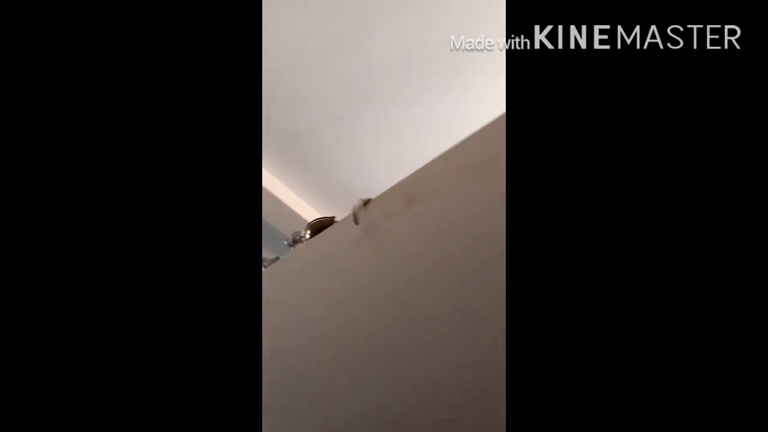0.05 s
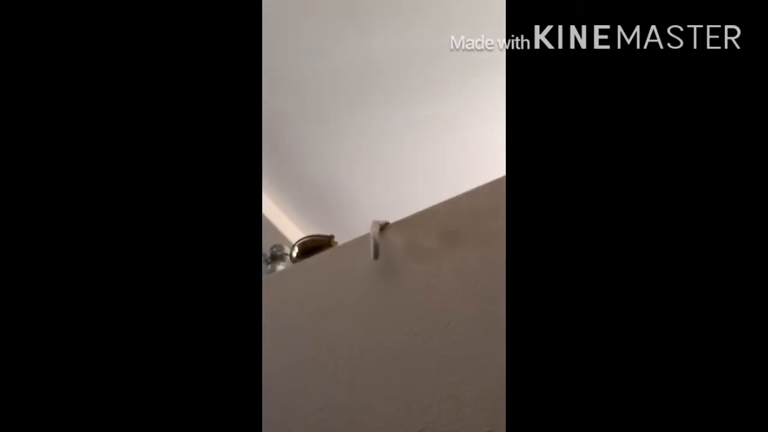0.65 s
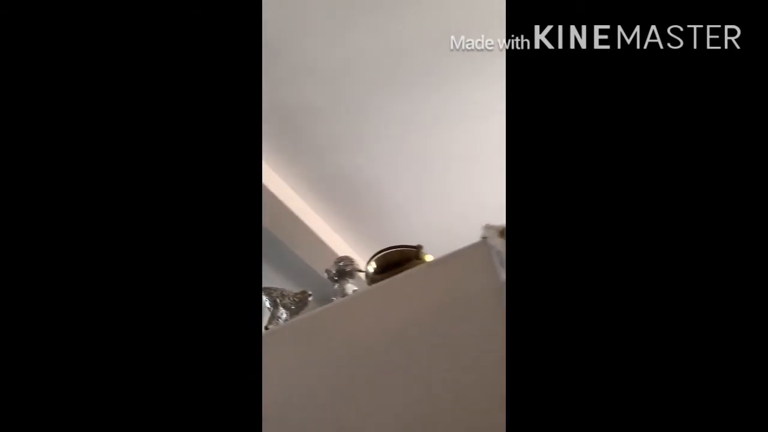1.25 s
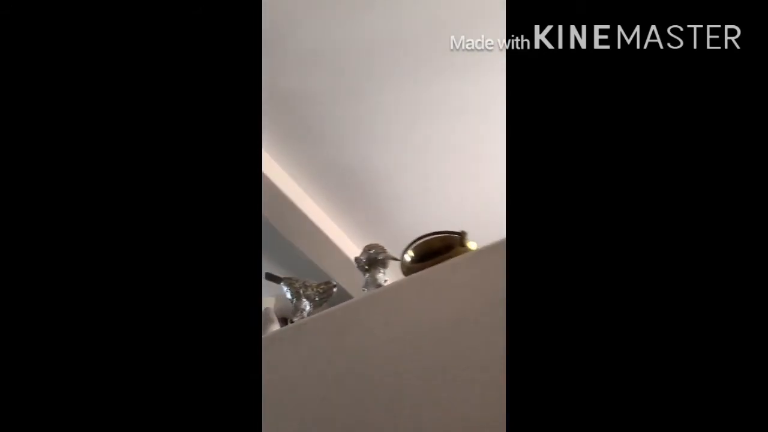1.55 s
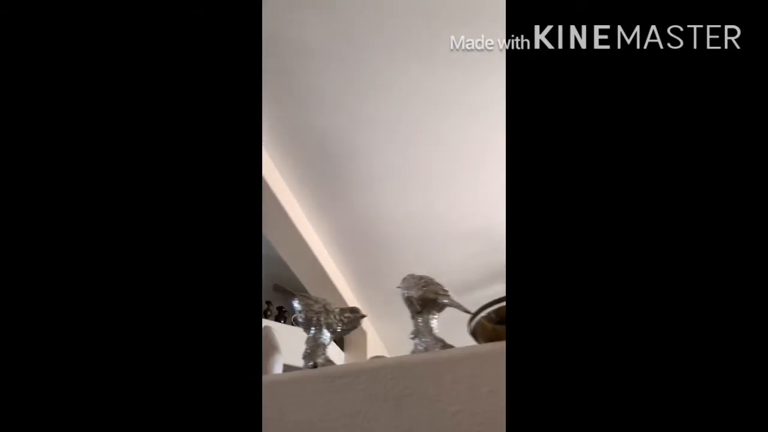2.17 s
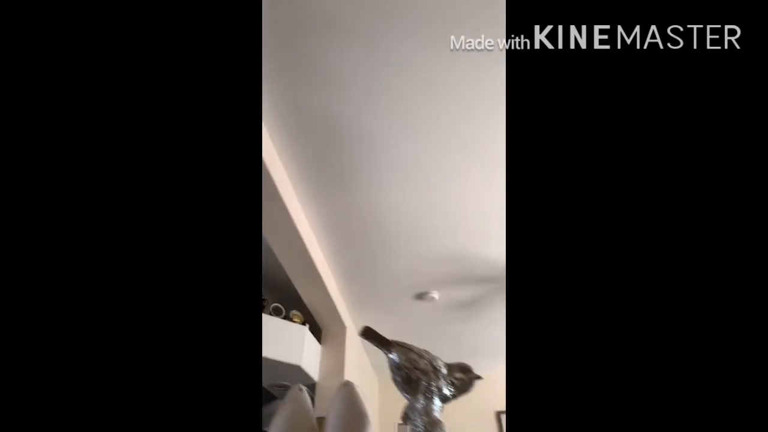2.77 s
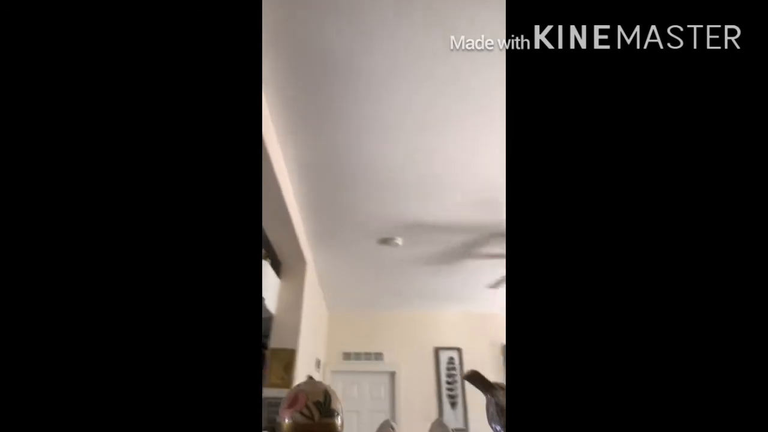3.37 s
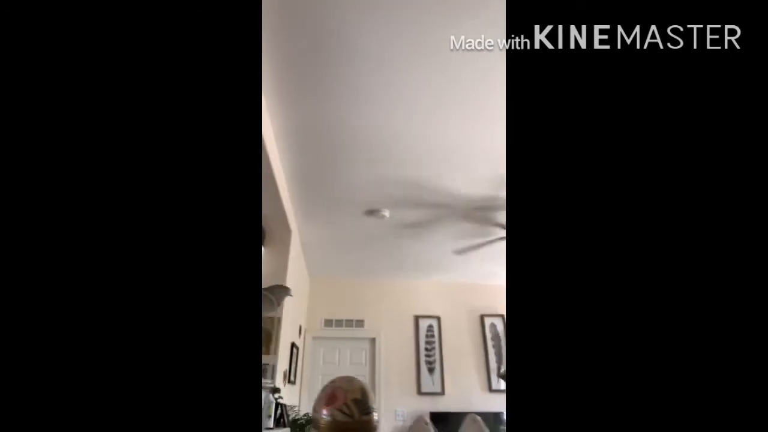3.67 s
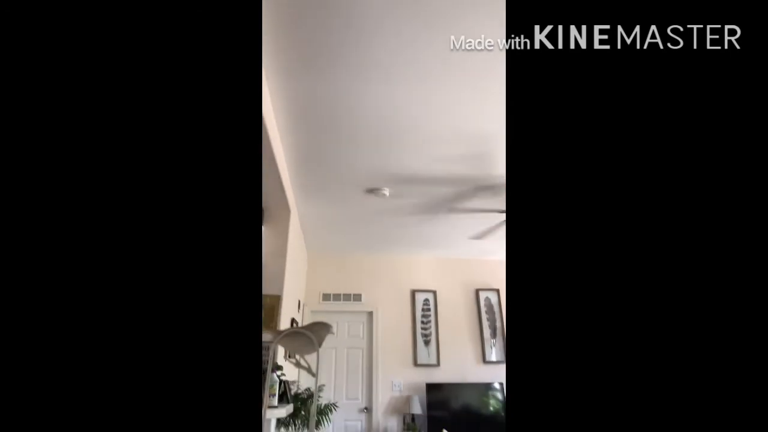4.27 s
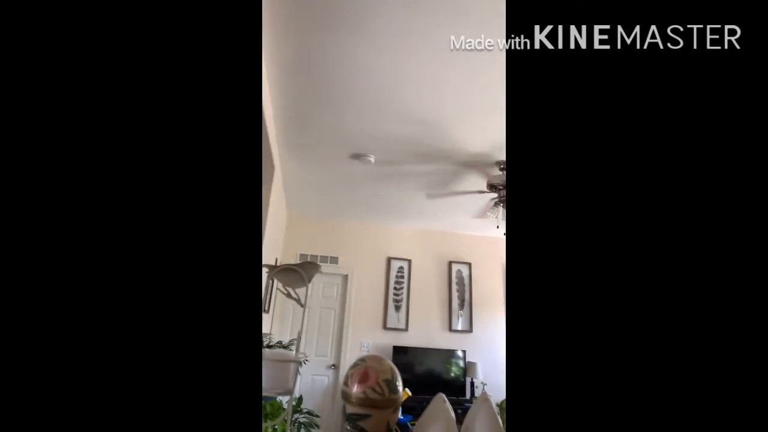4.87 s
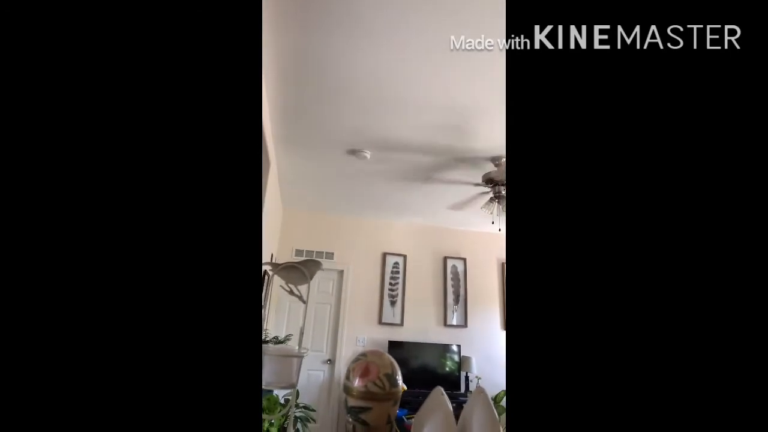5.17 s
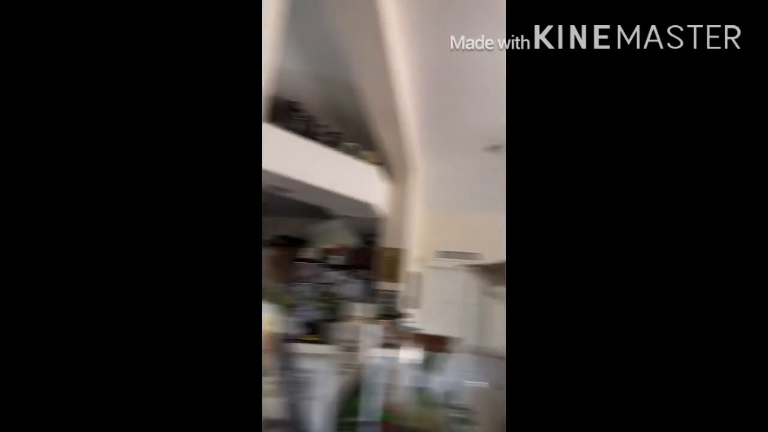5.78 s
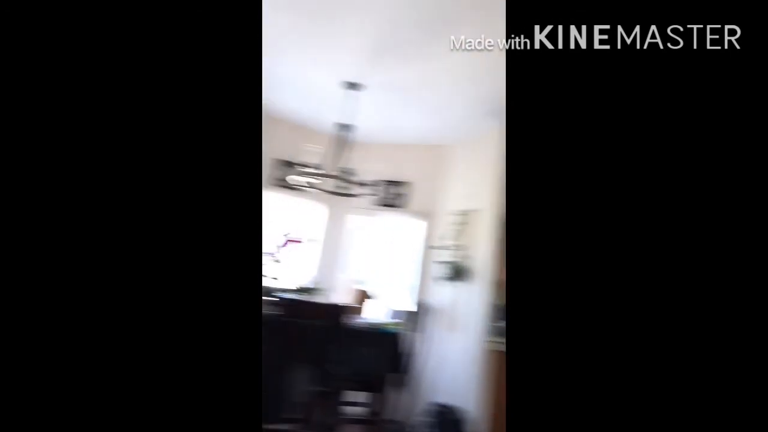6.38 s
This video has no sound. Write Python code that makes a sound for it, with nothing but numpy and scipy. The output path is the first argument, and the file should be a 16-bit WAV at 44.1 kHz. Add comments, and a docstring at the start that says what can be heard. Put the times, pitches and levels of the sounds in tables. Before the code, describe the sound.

Heavy, uneven blows land like footsteps on a wooden floor inside a quiet house, at first over a faint deep rumble. Some are dull thuds, others sharper knocks, several with a brief gritty scuff and a short room echo. A low drone swells and fades midway, while the thuds carry on to the end. The microphone, in the same room, also picks up soft hiss and a faint appliance hum and whine.

```python
"""A quiet house: a soft hiss settles while an appliance hums and whines, as it does throughout.
From the start, heavy, uneven blows land like footfalls on a wooden floor, at first over a deep rumble.
Their weight rings the joists (the beams under the floor) and their contact rings the boards; harder
contacts knock higher and louder. The room answers, and some blows come with a short scuff.
A low drone swells to its peak just after 2 s and fades from 3 s; the blows go on until about 6 s."""
import sys
import numpy as np
from scipy import signal
from scipy.fft import rfft, irfft, next_fast_len
from scipy.io import wavfile
from scipy.ndimage import uniform_filter1d, map_coordinates

SR = 44100
rng = np.random.default_rng(int(sys.argv[2]) if len(sys.argv) > 2 else 0)


def materialize(psi):
    """Save the field psi as 16-bit PCM at rate SR to the path in sys.argv[1].

    A 1-D psi becomes a single channel; in a 2-D psi each row is a channel.
    """
    bounded = np.clip(np.atleast_2d(psi).T, -1, 1)
    quanta = np.round(bounded * 32767).astype(np.int16)
    wavfile.write(sys.argv[1], SR, quanta)


N = 287973
TIME = np.arange(N) / SR
AGE = np.arange(SR * 3 // 4) / SR  # seconds since one blow or scuff began


def amp(db):
    """Turn decibels into a gain."""
    return 10 ** (np.asarray(db) / 20)


def unit(x):
    """Scale a sound so its average strength (rms) is 1."""
    return x / np.sqrt(np.mean(x ** 2) + 1e-20)


def along(points, hz):
    """Read between (frequency, value) points, with octaves evenly spaced."""
    f, v = np.transpose(points)
    return np.interp(np.log(hz + 1), np.log(f + 1), v)


def tint(x, colour):
    """Filter x by a colour: (f/Hz, level/dB) points that say how strong each frequency is."""
    m = next_fast_len(len(x) + 2048)
    return irfft(rfft(x, m) * amp(along(colour, np.fft.rfftfreq(m, 1 / SR))), m)[:len(x)]


def noise(colour, size):
    """Noise of strength 1 with the given colour."""
    return unit(tint(rng.standard_normal(size), colour))


def wobble(rate):
    """A smooth curve through `rate` random values a second."""
    return map_coordinates(rng.standard_normal(int(N * rate / SR) + 4), [TIME * rate])


def tone(hz, waver, sway_db):
    """A plain note whose phase wavers and whose level sways."""
    return np.sqrt(2) * np.sin(2 * np.pi * hz * TIME + waver * wobble(2.9)) * amp(sway_db * wobble(7.7))


def swell(start, end, rise_db_per_s, fall_db_per_s):
    """A gain that rises to 1 at start, holds until end, then falls."""
    return amp(-rise_db_per_s * np.maximum(start - TIME, 0) - fall_db_per_s * np.maximum(TIME - end, 0))


def add(track, s, sound):
    """Mix a sound into the track at s seconds."""
    part = track[max(round(s * SR), 0):][:len(sound)]
    part += sound[:len(part)]


# The colour of the room's hiss: f/Hz, relative level/dB
HISS_COLOUR = [(15, -19), (25, -11), (36, -31), (59, 6), (80, -16), (96, -1), (184, -8.5), (211, -12),
               (255, -7.5), (324, -13), (392, -12.5), (654, -17.5), (1780, -23.5), (2200, -22.5),
               (15800, -38.5)]

def hiss(settled_db=-60.5, peak_s=0.084, settle_s=0.27):
    """A soft hiss, louder at first, that settles and then wanders a little."""
    rush_db = 9.5 * np.exp(-abs(TIME - peak_s) / settle_s)
    drift_db = wobble(3.2)
    return amp(settled_db + rush_db + drift_db) * noise(HISS_COLOUR, N)


# The peaks of the deep rumble: t/s, level/dB
RUMBLE_PEAKS = [(0.02, -59), (.88, -61), (1.7, -65)]

def rumble():
    """Very low noise that comes and goes three times, weaker each time."""
    surges = sum(amp(db) * swell(s, s, rise_db_per_s=54, fall_db_per_s=54) for s, db in RUMBLE_PEAKS)
    colour = [(12, -34), (25, -20), (36, 11), (55, 9), (110, -24), (400, -68), (2000, -120)]
    return surges * noise(colour, N)


def drone(db=-55.5):
    """One low note that swells, holds and fades."""
    level = amp(db) * swell(start=2.24, end=3, rise_db_per_s=26, fall_db_per_s=27)
    return level * tone(hz=102, waver=.2, sway_db=.8)


# The notes in the motor's hum: f/Hz, level/dB
HUM_NOTES = [(59, -83), (102.5, -72.5), (150, -71.5), (182, -73), (300, -81.5), (362, -79)]

def appliance(whine_db=-73, turns_per_s=30.05):
    """A motor hums, and its thin whine flutters once a turn."""
    hum = sum(amp(db) * tone(hz, waver=0.56, sway_db=1.5) for hz, db in HUM_NOTES)
    flutter = .4 + np.exp(-(TIME * turns_per_s % 1) / .22)
    whine = noise([(1500, -11.5), (2100, -47), (2300, 2), (2480, -45), (3500, -13.5), (6000, -25)], N)
    return hum + amp(whine_db) * unit(flutter * whine)


# The colour of rubbing, before each scuff tilts it: f/Hz, relative level/dB
RUB_COLOUR = [(600, -4), (2500, 8), (4500, 2.5), (7000, -1.5), (10000, -7), (15000, -9)]
# The scuffs: t/s, level/dB, t60/s (the time to fade by 60 dB), tilt toward the treble/(dB per octave)
SCUFF_STROKES = [(.105, -54.5, 0.15, 0), (1.21, -54, 0.063, 2), (2.003, -41.5, 0.066, -5),
                 (2.109, -63, .09, 2), (2.538, -60, 0.16, -6.5), (2.668, -62, 0.14, 3.5),
                 (3.2585, -43.5, .07, -4.5), (3.929, -51.5, 0.29, 0.5), (4.019, -62.5, 0.42, 2),
                 (4.578, -53.5, 0.052, 4), (5.263, -52, .08, -1.5), (5.65, -67.5, 0.37, -1),
                 (5.885, -63.5, 0.52, 2), (5.948, -51.5, 0.3, -.5)]

def scuffs(grain_db=3):
    """Brief gritty rubbing that swells and dies away; longer strokes start more gently."""
    track = np.zeros(N)
    for s, db, t60, tilt_db in SCUFF_STROKES:
        rise_s = 0.0026 + 0.015 * t60
        room_tail = amp(-13 - 60 * AGE / 0.46)
        stroke = (1 - np.exp(-(AGE / rise_s) ** 2)) * (amp(-60 * AGE / t60) + room_tail)
        roughness = unit(uniform_filter1d(rng.standard_normal(len(AGE)), size=40))
        grit = unit(amp(grain_db * roughness))
        colour = [(hz, level + tilt_db * np.log2(hz)) for hz, level in RUB_COLOUR]
        add(track, s, amp(db) * stroke / stroke.max() * grit * noise(colour, len(AGE)))
    return track


# How long the room echoes, from low to high: f/Hz, t60/s
ECHO_TIMES = [(80, 0.55), (230, 0.38), (500, 0.43), (1000, 0.37), (3000, 0.32), (5000, 0.33), (14000, 0.32)]

def room(early_db, tail_db, spread_s=.012, ceiling_s=.011, ceiling_db=-4, count=14):
    """One path through the room: direct sound, echoes off walls and ceiling, then a blurred tail."""
    hz, t, spectrum = signal.stft(rng.standard_normal(len(AGE)), SR, nperseg=256)
    fade = amp(-60 * t / along(ECHO_TIMES, hz)[:, None])
    tail = signal.istft(spectrum * fade, SR, nperseg=256)[1][:len(AGE)]
    tail *= 1 - np.exp(-AGE / 0.0052)
    delays = (rng.uniform(0.11, 1, count) * spread_s * SR).astype(int)
    walls = np.bincount(delays, rng.choice([-1, 1], count) / np.sqrt(count), len(AGE))
    path = amp(early_db) * walls + amp(tail_db) * tail / np.linalg.norm(tail)
    path[0] += 1  # the direct sound
    path[round(ceiling_s * SR)] += amp(ceiling_db)
    # so many echoes ripple the spectrum finely but favour no broad band
    response = rfft(path, 2 * len(AGE))
    broad_power = uniform_filter1d(np.abs(response) ** 2, size=110)
    return irfft(response / np.sqrt(broad_power + 1e-9))[:len(AGE)]


def heard(sound, path, span_s=.05):
    """Send a sound along a path and scale it to strength 1 over its first span_s seconds."""
    echoing = signal.fftconvolve(sound, path)[:len(AGE)]
    return echoing / np.sqrt(np.mean(echoing[:int(span_s * SR)] ** 2))


def ring(modes, attack_s, centre_hz, octaves, boost_db=14):
    """Struck wood rings at its own fading notes (modes); the spot hit favours those near centre_hz."""
    hz, db, t60 = np.transpose(modes)[:, :, None]
    nearness = np.exp(-.5 * (np.log2(hz / centre_hz) / octaves) ** 2)
    gain = amp(db + boost_db * nearness + rng.standard_normal(hz.shape))
    notes = gain * amp(-60 * AGE / t60) * np.sin(2 * np.pi * hz * AGE)
    motion = notes.sum(axis=0) * (1 - np.exp(-AGE / attack_s))
    # the wood gives off little sound below its lowest note or above its highest
    band = [.85 * hz.min(), 1.3 * hz.max()]
    return signal.sosfilt(signal.butter(2, band, "band", fs=SR, output="sos"), motion)


# The deep notes of the joists: f/Hz, relative level/dB, t60/s
JOIST_MODES = [(66.3, 8.5, 0.079), (86, -2, 0.27), (129.2, 1, 0.17), (172.3, 8.5, 0.061),
               (204.8, 1.5, 0.14), (225.1, 2.5, 0.16), (262.3, 1, 0.16)]

def joist_thud(hz):
    """A blow's weight rings the joists, which build up slowly and linger in the room."""
    joists = ring(JOIST_MODES, attack_s=.0049, centre_hz=hz, octaves=.62, boost_db=17.5)
    return heard(joists, room(early_db=-4, tail_db=0), span_s=.09)


# The middle notes of the floorboards: f/Hz, relative level/dB, t60/s
BOARD_MODES = [(270, 3, 0.011), (336, -2.5, 0.057), (363.3, -3, 0.1), (379, 7.5, 0.037), (446, 1.5, 0.04),
               (542, 6, 0.0208)]

def board_ring(hz):
    """The boards answer the contact at once and spend most of their energy in a few swings."""
    boards = ring(BOARD_MODES, attack_s=.001, centre_hz=hz, octaves=.4)
    return heard(boards, room(early_db=1, tail_db=-2))


# The floor's higher notes: f/Hz, relative level/dB, t60/s
KNOCK_MODES = [(586, 4, 0.046), (700, 8, 0.016), (770, -6, 0.063), (816, -0.5, 0.036), (900, -7, 0.056),
               (940, 7, 0.022), (1064, 4, 0.021), (1159, -5.5, 0.026), (1390, -1.5, 0.017),
               (1427, 0, 0.016), (1640, -9, 0.017)]

def contact_knock(hz):
    """The contact sets off short notes in the wood, higher when it is harder."""
    wood = ring(KNOCK_MODES, attack_s=.0007, centre_hz=hz, octaves=.45, boost_db=16)
    return heard(wood, room(early_db=0, tail_db=-2.5))


# The floor's highest notes: f/Hz, relative level/dB, t60/s
CLICK_MODES = [(1315, -27, 0.033), (1510, 17.5, 0.0086), (2090, -21, 0.02), (2243, 0, 0.025),
               (2420, 3, 0.014), (2717, 0, 0.019), (3110, -10, 0.02), (3260, -1.5, 0.028),
               (3700, -22, 0.0034)]
# A stronger blow clicks higher: board level/dB, favoured f/Hz
CLICK_PITCH = [(-46, 1700), (-38.5, 2680)]
# The colour of the sharp snap in each click: f/Hz, relative level/dB
SNAP_COLOUR = [(300, -3.5), (1400, 11.5), (1900, -1), (2800, 5.5), (4000, -7), (5000, -14.5), (6000, -18),
               (8000, -29), (15000, -32)]

def bright_click(board_db):
    """A hard contact adds a bright click that reaches the ear mostly by way of the walls."""
    hz = np.interp(board_db, *np.transpose(CLICK_PITCH))
    wood = unit(ring(CLICK_MODES, attack_s=.00067, centre_hz=hz, octaves=.18))
    snap = unit(tint(signal.unit_impulse(len(AGE), SR // 1000), SNAP_COLOUR))
    return heard(wood + amp(3.5) * snap, room(early_db=6, tail_db=4))


# The blows, with the frequency each favours in each part of the floor:
# t/s, thud level/dB, thud f/Hz, board level/dB, board f/Hz, contact f/Hz (higher is harder)
FLOOR_BLOWS = [(0.004, -53.5, 78, -72, 376, 750), (0.107, -45, 125, -50.5, 323, 390),
               (0.243, -54, 137, -46.5, 370, 436), (0.776, -62, 151, -64.5, 378, 625),
               (1.2100, -44, 175, -33.5, 398, 840), (1.2891, -38.5, 190, -38, 310, 763),
               (1.532, -60, 170, -58, 390, 560), (1.68, -68, 147, -59.5, 378, 700),
               (2.004, -39, 200, -38.5, 514, 1060), (2.1072, -45.5, 160, -46.5, 418, 590),
               (2.667, -52, 145, -54, 367, 580), (2.987, -60, 112, -68.5, 385, 900),
               (3.2655, -48, 125, -31, 340, 862), (3.2761, -68, 130, -52, 463, 1560),
               (3.388, -50, 133, -70, 380, 600), (3.74, -51, 127, -60, 375, 710),
               (3.93, -41, 203, -44, 308, 744), (4.021, -48, 175, -54.5, 330, 490),
               (4.383, -52.5, 214, -58, 288, 825), (4.582, -38, 169, -49.5, 320, 724),
               (5.2632, -39.5, 260, -41, 507, 595), (5.949, -52, 154, -57.5, 297, 750),
               (6.09, -56.5, 122, -67.5, 380, 800)]

def blows(even_hz=852, knock_db_per_octave=18, click_db=-6.5):
    """Soft blows mostly thud in the joists; hard ones also ring the boards, knock and click."""
    track = np.zeros(N)
    for s, thud_db, thud_hz, board_db, board_hz, contact_hz in FLOOR_BLOWS:
        thud = amp(thud_db) * joist_thud(thud_hz)
        board = amp(board_db) * board_ring(board_hz)
        # a contact at even_hz knocks as loudly as the boards ring; a harder one knocks louder
        knock_db = board_db + knock_db_per_octave * np.log2(contact_hz / even_hz)
        knock = contact_knock(contact_hz) + amp(click_db) * bright_click(board_db)
        add(track, s, thud + board + amp(knock_db) * knock)
    return track


def scene():
    """All the sounds of the house, mixed into one channel."""
    return (blows() + scuffs() + appliance() + hiss() + rumble() + drone())[None]


def record(dry, top_hz=15800):
    """Cut away the very highest treble, above top_hz."""
    m = next_fast_len(N + SR // 2)
    return irfft(rfft(dry, m) * (np.fft.rfftfreq(m, 1 / SR) < top_hz), m)[..., :N]


dry = scene()
out = record(dry)
materialize(out)
```